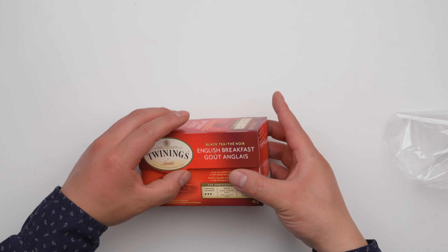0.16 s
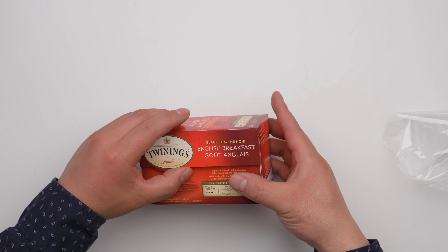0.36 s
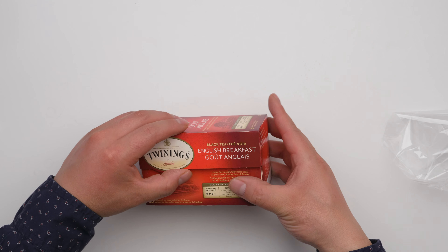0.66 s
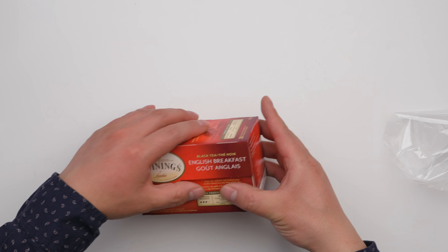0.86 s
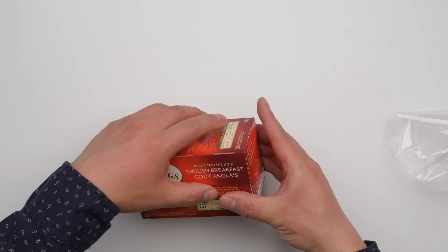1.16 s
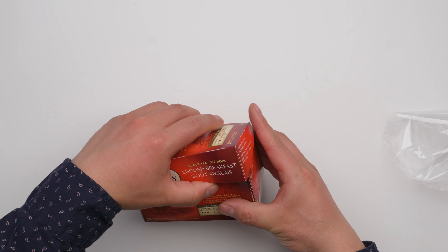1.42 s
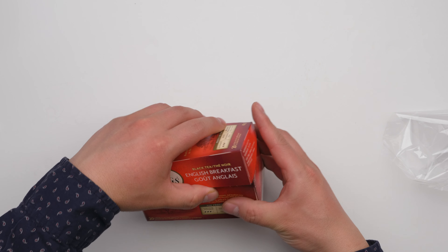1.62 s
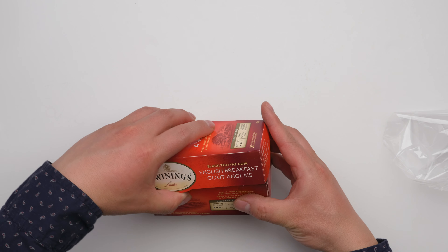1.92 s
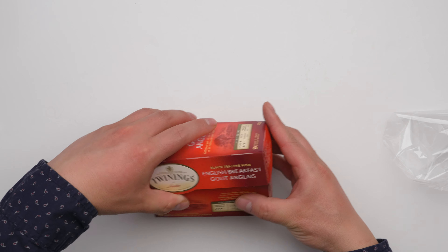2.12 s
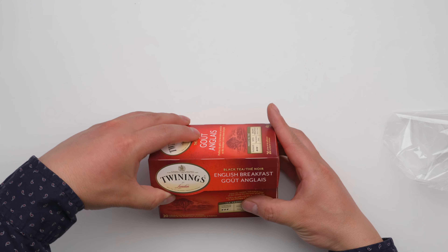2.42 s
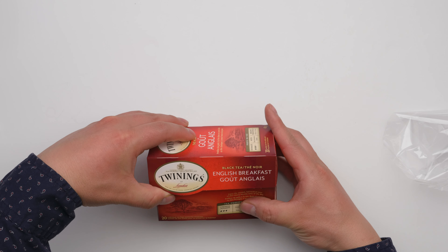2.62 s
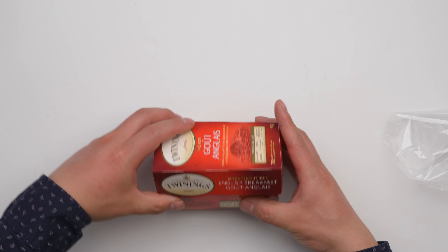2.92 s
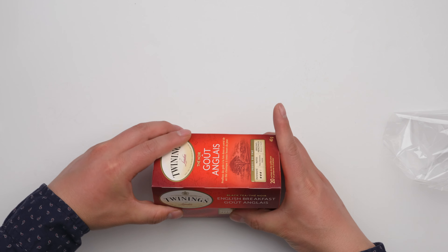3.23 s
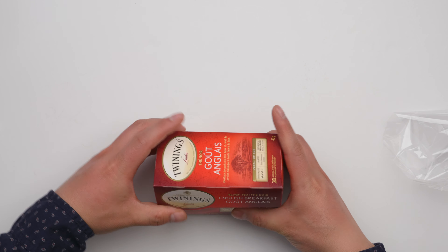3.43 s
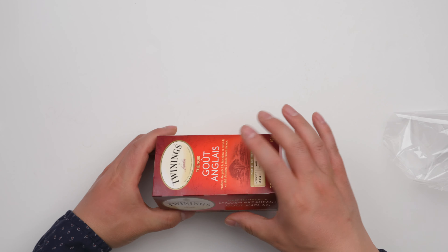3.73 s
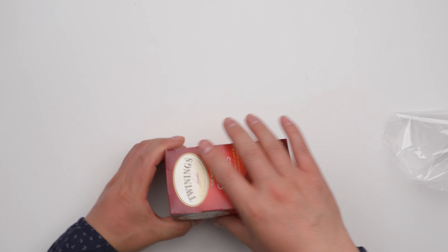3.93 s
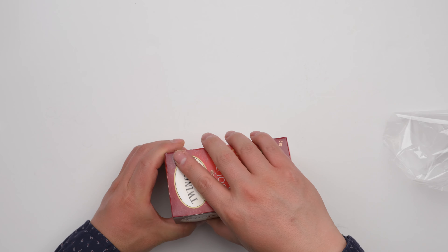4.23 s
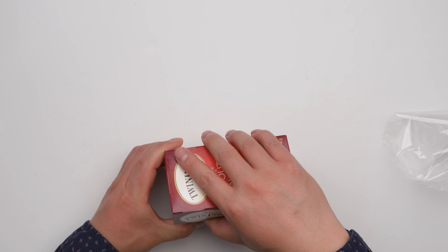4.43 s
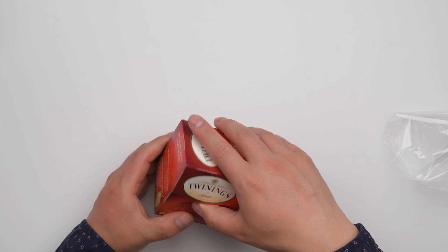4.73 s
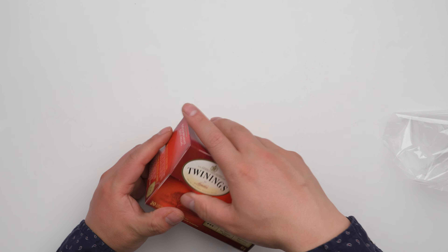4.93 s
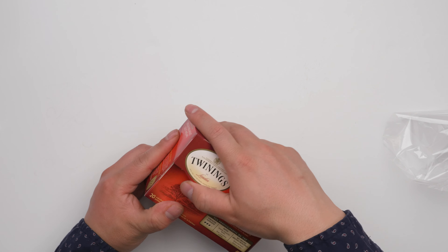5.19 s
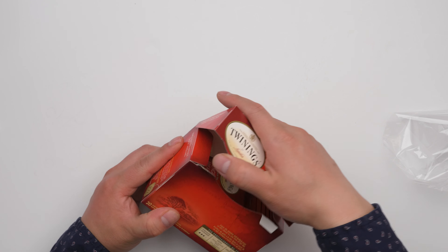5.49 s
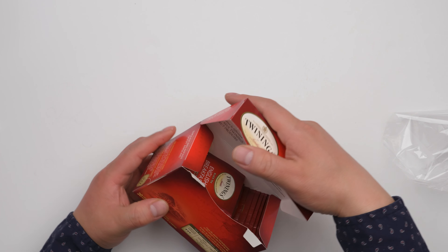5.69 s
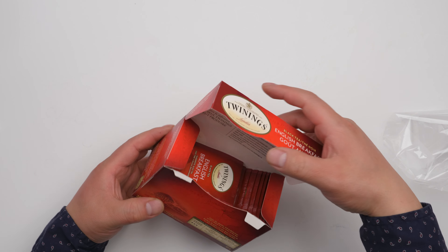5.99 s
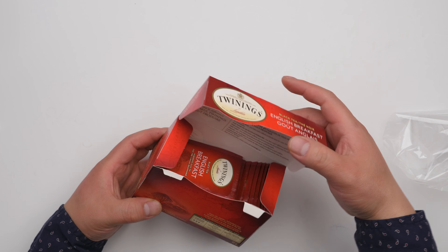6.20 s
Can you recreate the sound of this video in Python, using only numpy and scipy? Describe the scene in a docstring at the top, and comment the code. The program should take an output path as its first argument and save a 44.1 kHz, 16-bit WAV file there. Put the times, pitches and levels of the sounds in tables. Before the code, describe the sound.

Close handling of a small full cardboard box: dry sliding, ticks and hollow knocks, then the lid snaps open.

```python
"""A small full cardboard box on a table in a quiet room, turned and opened close to one microphone.
First fingers slide over the card and excite its hollow panels; at 1.4 s a tab snaps and rings them.
Then the hands turn the box and press its seams: taps, ticks of fibre and skin, a faint hum around 2 s,
a sharp knock at 3.8 s. More rubbing and brief squeaks follow. Just after 5 s the lid is pulled open
with two snaps, the air inside humming on, and a last knock at 6.3 s dies away into the room air."""
import sys
import numpy as np
from scipy import signal
from scipy.fft import rfft, irfft, next_fast_len
from scipy.io import wavfile
from scipy.ndimage import uniform_filter1d

SR = 44100
rng = np.random.default_rng(int(sys.argv[2]) if len(sys.argv) > 2 else 0)


def generate_wav(sig):
    """Save sig (samples, or channels by samples) to the path in sys.argv[1] as 16-bit PCM at SR."""
    pcm = np.round(np.clip(np.atleast_2d(sig).T, -1, 1) * 32767).astype(np.int16)
    wavfile.write(sys.argv[1], SR, pcm)


N = 280035
T = np.arange(N) / SR
FADE_DB = 20  # how far a swell is down at its ends, a shudder once faded


def undb(db):
    """Decibels to gain."""
    return 10 ** (np.asarray(db) / 20)


def unit(x):
    """Scale to rms 1."""
    return x / np.sqrt(np.mean(x ** 2))


def butter(x, hz, kind="low"):
    """Pass x through a gentle Butterworth filter."""
    return signal.lfilter(*signal.butter(2, hz, kind, fs=SR), x)


def ring(x, modes, near_hz=None, reach=0.4, rest=0.2, opposed=True):
    """Damped modes driven by x, loudest within reach octaves of near_hz; opposed ones alternate in sign."""
    out = 0
    for k, (hz, db, t60) in enumerate(modes):
        r, w = np.exp(-np.log(1000) / (t60 * SR)), 2 * np.pi * hz / SR
        share = 1 if near_hz is None else rest + np.exp(-(np.log2(hz / near_hz) / reach) ** 2)
        # the double zero at 0 Hz: a small box radiates no bass
        mode = signal.lfilter([1, -2, 1], [1, -2 * r * np.cos(w), r * r], x) / w
        out = out + (-1) ** (k * opposed) * undb(db) * share * mode
    return out


def colour(x, points):
    """Shape the spectrum of x by (f/Hz, level/dB) points."""
    size = next_fast_len(len(x))
    hz, db = np.transpose(points)
    gain = undb(np.interp(np.log(np.fft.rfftfreq(size, 1 / SR) + 1), np.log(hz), db, left=-60))
    return irfft(rfft(x, size) * gain, size)[:len(x)]


def walk(rate):
    """Random levels held 1 / rate s and slewed; spread near 1."""
    k = int(SR / rate)
    return 1.41 * uniform_filter1d(np.repeat(rng.standard_normal(N // k + 1), k), k)[:N]


def swell(s, half, db):
    """Bell-shaped gain that peaks at time s."""
    return undb(db - FADE_DB * ((T - s) / half) ** 2)


def add(track, s, sound, peak_db):
    """Lay a sound into the track at its peak level."""
    i = int(s * SR)
    sound = sound[:N - i]
    track[i:i + len(sound)] += sound * undb(peak_db) / np.abs(sound).max()


# noise floor at the microphone: (f/Hz, relative level/dB)
AIR_SPECTRUM = [(30, -0.5), (92, 7.5), (656, 15.5), (1050, 2.5), (2100, 1.5), (8060, -9.5), (15500, -14)]


def room_air(level_db=-49.5):
    """Room air and recorder noise: a steady, dull wash."""
    return undb(level_db) * unit(colour(rng.standard_normal(N), AIR_SPECTRUM))


def faint_hum(start_s=1.79, end_s=2.74, fade_s=0.12, hz=296, level_db=-56):
    """A low, wavering tone comes and goes in the background."""
    outside_s = np.maximum(np.maximum(start_s - T, T - end_s), 0)
    gain = undb(level_db - 20 * outside_s / fade_s + 1.7 * walk(16))
    return gain * np.sqrt(2) * np.sin(2 * np.pi * hz * T)


# the table top under the box: (f/Hz, relative level/dB, t60/s)
TABLE_MODES = [(42.4, 0, 0.16), (83, 2, 0.03), (133, 8.5, 0.081), (210.4, 9.5, 0.25)]
# soft bumps on the table: (t/s, peak level/dB, f/Hz)
TABLE_BUMPS = [(0.269, -37, 61.4), (2.902, -37, 180), (3.101, -38, 186), (4.811, -39.5, 148),
               (4.976, -30, 140)]


def table_bumps():
    """Hand or box nudges the table top and rings its low modes."""
    out, t = np.zeros(N), T[:SR // 4]
    push = t * np.exp(-t / 0.0022)
    for s, db, hz in TABLE_BUMPS:
        add(out, s, ring(push, TABLE_MODES, hz, reach=0.87, rest=0.02), db)
    return out


# tones of the air under the lid: (middle t/s, half length/s, f/Hz, level/dB)
CAVITY_TONES = [(1.468, 0.028, 468, -38), (5.28, 0.037, 504, -34)]


def lid_cavity(t60_s=0.25, sag_hz_per_s=690):
    """The air inside the lifted lid hums on after a snap, sagging a little in pitch."""
    out, pole = 0, np.exp(-np.log(1000) / (t60_s * SR))
    for s, half, hz, db in CAVITY_TONES:
        wobble = unit(signal.lfilter([1], [1, -pole], rng.standard_normal(N))) / 2
        phase = 2 * np.pi * (hz - sag_hz_per_s * (T - s) / 2) * (T - s)
        out = out + swell(s, half, db) * (1 + wobble) * np.sin(phase + wobble)
    return out


# squeaks on the card: (middle t/s, half length/s, f/Hz, level/dB)
CARD_SQUEAKS = [(0.404, 0.045, 4950, -47), (1.363, 0.024, 4500, -26.5), (4.692, 0.027, 1790, -39),
                (4.983, 0.0036, 1676, -17)]


def squeaks(relative_width=0.11):
    """Skin or fibres catch on one narrow resonance for a moment."""
    out = 0
    for s, half, hz, db in CARD_SQUEAKS:
        band_hz = [hz * (1 - relative_width / 2), hz * (1 + relative_width / 2)]
        out = out + swell(s, half, db) * unit(butter(rng.standard_normal(N), band_hz, "band"))
    return out


# fibres, and skin leaving the glossy card, heard close up: (t/s, peak level/dB, centre f/Hz)
FIBRE_TICKS = [(0.275, -19, 5600), (0.703, -20.5, 3620), (0.7287, -17, 4930), (1.2913, -26.5, 4150),
               (1.318, -21, 4300), (1.34, -14, 3500), (1.35, -12.5, 4480), (2.347, -28, 2400),
               (2.374, -15.5, 3500), (2.385, -22, 2500), (2.399, -19, 3000), (2.425, -19.5, 3020),
               (2.446, -33, 2200), (2.4558, -19, 2580),  (2.831, -22.5, 2250), (3.019, -22, 4130),
               (3.17, -30, 1760), (3.231, -28, 2650), (3.292, -23, 1900), (3.344, -24.5, 2060),
               (3.355, -19.5, 1860), (3.4226, -23, 6000), (3.445, -22.5, 1900), (3.6035, -19.5, 4960),
               (4.3081, -18.5, 3100), (4.324, -22.5, 3800), (4.3465, -21.5, 4280), (4.37, -24.5, 3430),
               (4.398, -18, 1980), (4.8078, -26, 6000), (4.8212, -25, 5960), (4.8402, -22, 5970),
               (4.858, -22.5, 3000), (4.921, -22, 4930), (5.268, -33, 5000), (5.271, -19, 4000),
               (5.3319, -14.5, 3450), (5.501, -18, 2000), (5.56, -21, 4450)]


def ticks():
    """Fibres and skin let go in tiny bursts; the duller the tick, the more it knocks edges and panels."""
    out, t = np.zeros(N), T[:SR // 40]
    knock = ring(t * np.exp(-t / 0.00017), PANEL_MODES, 550, opposed=False) * np.exp(-t / 0.014)
    for s, db, hz in FIBRE_TICKS:
        burst = rng.standard_normal(len(t)) * (np.exp(-t / 0.00058) + undb(-14.5) * np.exp(-t / 0.0069))
        add(out, s, colour(burst, [(hz / 6, -24), (hz, 0), (20000, -14)]), db)
        dull_db = db - 8 * np.log2(hz / 2000)
        add(out, s, ring(burst, EDGE_MODES, hz), dull_db - 4.5)
        add(out, s, knock, dull_db - 1.5)
    return out


# hiss of the card's surface: (f/Hz, relative level/dB)
HISS_SPECTRUM = [(2500, -7), (4600, 2), (6000, -3), (8500, -7), (12000, -15), (16000, -21)]


def paper_hiss(force, snaps_per_s=70):
    """Friction hiss with dry fibres snapping at random; each half octave comes and goes by itself."""
    breaks = (rng.random(N) < snaps_per_s / SR) * rng.exponential(size=N)
    snaps = signal.lfilter([1], [1, -0.9], breaks) * rng.standard_normal(N)
    hiss = unit(unit(colour(force, HISS_SPECTRUM)) + undb(-14) * unit(colour(snaps, HISS_SPECTRUM)))
    bands = [signal.lfilter(*signal.iirpeak(hz, 4.5, SR), hiss) for hz in 2700 * 2 ** (np.arange(6) / 2)]
    return unit(sum(undb(5.04 * walk(10)) * band for band in bands))


# fingers or card sliding along the box: (middle t/s, half length/s, panel, scrape and hiss level/dB)
SLIDES = [(0.045, 0.054, -26, -35.5, -45), (0.194, 0.25, -30, -34.5, -46), (0.506, 0.38, -34.5, -41.5, -60),
          (0.911, 0.17, -43, -50.5, -47), (1.148, 0.71, -47.5, -79, -71), (1.373, 0.051, -18, -22, -29.5),
          (2.398, 0.12, -34.5, -41.5, -57), (2.858, 0.06, -34.5, -37, -51),
          (3.271, 0.22, -38.5, -45.5, -55.5), (3.619, 0.099, -34, -39.5, -45.5),
          (3.87, 0.22, -29.5, -39.5, -50), (4, 0.08, -23, -26, -36.5), (4.174, 0.033, -34.5, -46, -72),
          (4.422, 0.83, -53.5, -51.5, -86), (4.585, 0.11, -34.5, -38.5, -37.5),
          (4.812, 0.58, -39, -52, -60), (5.613, 0.12, -34, -34.5, -53), (5.858, 0.12, -37, -37.5, -43),
          (6.15, 0.28, -44.5, -50, -52.5)]
# box and contents rustling after a jolt: (t/s, fade/s, panel, scrape and hiss level/dB)
JOLT_RUSTLES = [(1.408, 0.15, -27, -54, -56), (1.681, 0.086, -33.5, -41, -48),
                (1.798, 0.1, -30.5, -39, -42.5), (1.914, 0.039, -32, -39, -60),
                (2.012, 0.029, -28.5, -35, -57), (2.164, 0.076, -29, -35, -44),
                (2.251, 0.095, -36, -46, -46), (2.533, 0.088, -34.5, -38, -54),
                (2.897, 0.21, -28.5, -33, -40.5), (3.095, 0.04, -32.5, -34, -47.5),
                (3.488, 0.037, -20, -26, -37), (3.819, 0.02, -14, -25, -47), (4.99, 0.12, -24, -27, -35.5),
                (5.241, 0.54, -37.5, -46, -81), (5.344, 0.17, -32.5, -35, -45),
                (5.507, 0.043, -23.5, -35, -43), (6.275, 0.37, -30.5, -46.5, -71)]


def contact_db(resting_db=(-93, -59, -85), slide_roundness=1.56, rise_s=0.017):
    """Levels of panel hum, scrape and hiss: resting hands, slides and shudders add up in power."""
    power = undb(resting_db)[:, None] ** 2
    for s, half, *db in SLIDES:
        away = np.abs((T - s) / half) ** slide_roundness
        power = power + undb(np.c_[db] - FADE_DB * away) ** 2
    for s, fade, *db in JOLT_RUSTLES:
        away = np.maximum((T - s) / fade, (s - T) / rise_s)
        power = power + undb(np.c_[db] - FADE_DB * away) ** 2
    return 10 * np.log10(power)


def friction(catches_per_s=300, slip_s=0.00071):
    """Skin and card catch and let go in short bursts: a grainy, uneven force."""
    judder_db = 1.6 * walk(70)  # the grip tightens and eases
    catches = (rng.random(N) < catches_per_s / SR) * undb(np.minimum(5.6 * rng.exponential(size=N), 13))
    slips = signal.lfilter([1], [1, -np.exp(-1 / (slip_s * SR))], catches)
    return unit((1 + 0.38 * unit(slips)) * rng.standard_normal(N)) * undb(judder_db)


# hollow panels of the box: (f/Hz, relative level/dB, t60/s)
PANEL_MODES = [(242, -3.5, 0.024), (412, 3, 0.012), (476, 0, 0.033), (575, 1, 0.015), (622.5, -3, 0.058),
               (687.2, 3, 0.023), (709.4, 2.5, 0.04), (777, -7, 0.045), (856.7, -9.5, 0.086),
               (960, -3.5, 0.027)]
# stiff edges and flaps: (f/Hz, relative level/dB, t60/s)
EDGE_MODES = [(1328, -8, 0.032), (1796, 8, 0.012), (2042, 5, 0.0097), (2362, 4, 0.011), (3000, -9, 0.0095),
              (4450, -31, 0.01)]
# which panel the grip leaves free to sound: (t/s, f/Hz)
FREE_PANEL = [(0, 810), (.3, 697), (.82, 650), (1.36, 675), (1.46, 500), (1.75, 632), (5.05, 617),
              (5.28, 480), (5.55, 680), (6.2, 533), (6.28, 840)]
# which edge the grip leaves free to sound: (t/s, f/Hz)
FREE_EDGE = [(0, 1260), (.2, 2680), (.75, 1440), (1.36, 2460), (2.4, 2460), (3.49, 2250), (4.0, 1400),
             (5.0, 1980), (5.86, 1480)]


def rubbing():
    """Sliding skin and card, close to the microphone, drive the panels, the edges and a bare hiss."""
    panel_db, scrape_db, hiss_db = contact_db()
    force = friction()
    dull = butter(force, 1500) * undb(2.14 * walk(70))  # soft skin passes little treble to the panels
    panels = unit(ring(dull, PANEL_MODES, np.interp(T, *np.transpose(FREE_PANEL)), reach=0.67))
    thud = undb(-24.5) * unit(butter(force, [120, 320], "band"))
    edges = unit(ring(butter(force, 5000), EDGE_MODES, np.interp(T, *np.transpose(FREE_EDGE)), reach=1))
    rasp = unit(colour(force, [(950, 8.5), (1300, 6.5), (3400, -10.5), (20000, -100)]))
    scrape = unit(edges + undb(-2.5) * rasp)
    # light strokes of skin stir the edges little and sound airier than card on card
    airy_db = np.minimum(0.6 * (hiss_db - scrape_db), 3) - 4.5
    hiss = paper_hiss(force) + undb(airy_db) * unit(butter(force, 9000, "high"))
    return undb(panel_db) * (panels + thud) + undb(scrape_db) * scrape + undb(hiss_db) * hiss


# taps, creaks and snapping tabs: (t/s, panel peak level/dB, panel f/Hz, edge trim/dB, crack trim/dB)
CARD_KNOCKS = [(1.327, -25, 630, 0.5, -7), (1.408, -12, 480, -7.5, -9), (1.4124, -3.5, 414, -40, -21),
               (1.672, -22.5, 564, -12, -10), (1.794, -20.5, 800, -28, -31), (2.004, -21, 676, -10.5, -18),
               (2.1815, -11, 720, -20, -22), (2.246, -23.5, 780, -19, -18.5), (2.359, -19, 670, -16, -24),
               (2.528, -18, 605, -1.5, -12), (2.654, -19.5, 720, -17.5, -11),
               (2.895, -8.5, 714, -17, -14.5), (3.098, -23.5, 603, -13, -32), (3.304, -13, 662, -16, -23),
               (3.486, -13, 819, -7, -7.5), (3.573, -14, 540, -18, -23.5), (3.715, -24.5, 651, -11, -9.5),
               (3.812, 0, 555, -29, -24), (4.98, -15.5, 802, -8, -16.5), (5.126, -16, 651, -46, -44),
               (5.2304, -3, 526, -9, -19), (5.336, -1, 549, -21, -13), (6.266, 0, 662, -21.5, -26.5)]


def knocks():
    """A short push rings the nearest panels and the table; its ragged part rings the flaps and cracks."""
    out, t = np.zeros(N), T[:SR // 8]
    envelope = (1 - np.exp(-t / 0.00029)) * (np.exp(-t / 0.0022) + undb(-14) * np.exp(-t / 0.002))
    table = ring(t * np.exp(-t / 0.00098), TABLE_MODES[1:])
    for s, db, hz, edge_db, crack_db in CARD_KNOCKS:
        grit, crack = rng.standard_normal((2, len(t))) * envelope
        ragged = uniform_filter1d(grit, size=9)
        push = t / 0.00024 * np.exp(-t / 0.0004) + 0.29 * ragged
        flaps = ring(ragged * np.exp(-t / 0.00071), EDGE_MODES, np.interp(s, *np.transpose(FREE_EDGE)))
        add(out, s, ring(push, PANEL_MODES, hz, reach=0.062, rest=0.012, opposed=False), db)
        add(out, s, flaps * np.exp(-t / 0.0056), db + edge_db + 6)
        add(out, s, colour(crack, HISS_SPECTRUM), db + crack_db + 9)
        add(out, s, table, db - 39.5)
    return out


def scene(room_t60_s=0.092, room_db=-17):
    """The box at close range, mostly direct sound, with a short room tail and the background; mono."""
    box = rubbing() + knocks() + table_bumps() + ticks() + lid_cavity() + squeaks()
    t = T[:SR // 3]
    decay = np.exp(-np.log(1000) * t / room_t60_s) * (t > 0.003)
    tail = signal.lfilter([1], [1, -0.6], rng.standard_normal(len(t))) * decay
    room = signal.fftconvolve(box, tail / np.sqrt(np.sum(tail ** 2)))[:N]
    return (box + undb(room_db) * room + faint_hum() + room_air())[None]


def record(dry):
    """The recorder rounds the loudest peaks and cuts the top."""
    ceiling, top_hz = 0.84, 15900
    lowpass = signal.ellip(10, 0.2, 70, top_hz, fs=SR, output="sos")
    return signal.sosfilt(lowpass, ceiling * np.tanh(dry / ceiling))


dry = scene()
out = record(dry)
generate_wav(out)
```